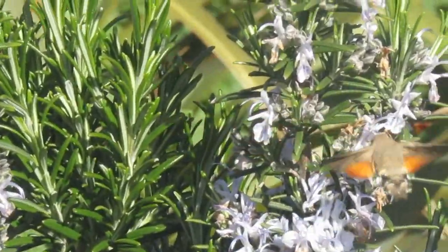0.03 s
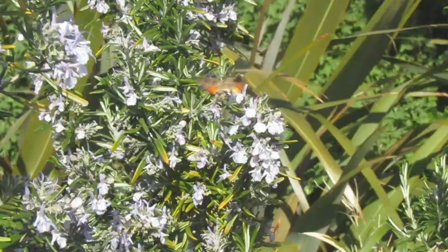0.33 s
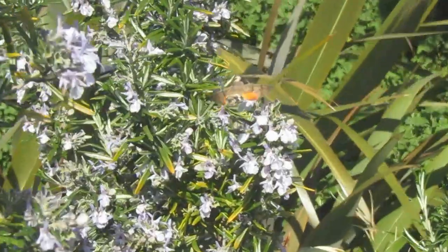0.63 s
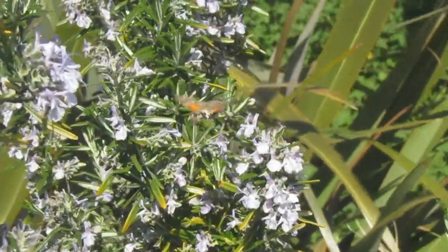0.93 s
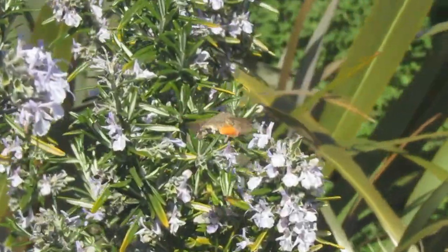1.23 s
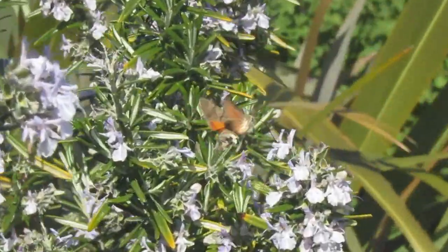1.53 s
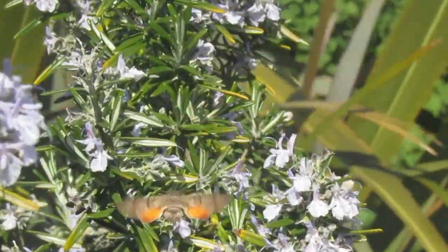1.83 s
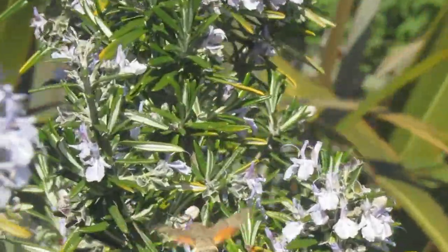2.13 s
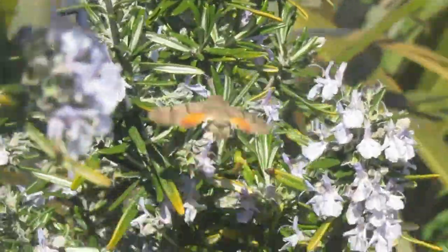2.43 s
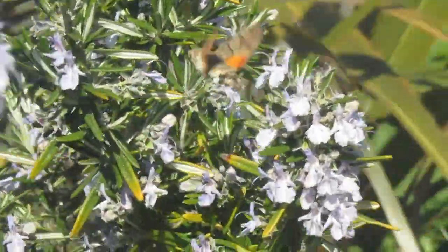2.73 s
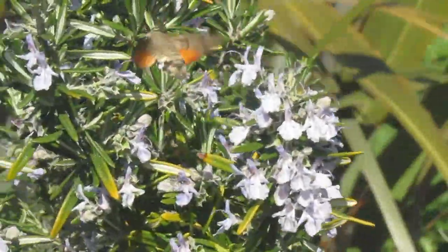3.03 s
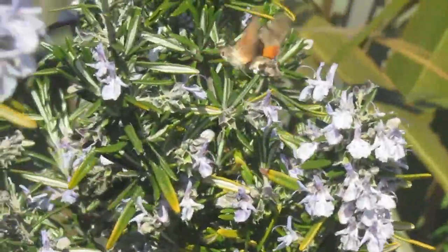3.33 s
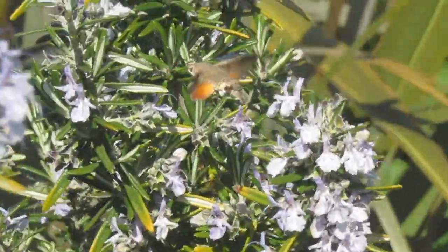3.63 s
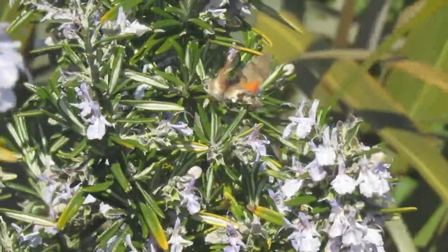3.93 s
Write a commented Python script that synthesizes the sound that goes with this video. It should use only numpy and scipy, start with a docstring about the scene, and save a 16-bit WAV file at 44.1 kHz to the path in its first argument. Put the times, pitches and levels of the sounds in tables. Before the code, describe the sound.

Gusty wind rumbles and thumps on the microphone outdoors, twice hard enough to distort. Before it arrives, a zoom motor whirs softly close by over quiet garden air, far birds and an engine hum, which briefly drop out.

```python
"""A sunny garden, heard through the microphone of a small camera. An engine idles far off under a brief hum.
The garden dips as the zoom motor whirs briefly, close by; everything cuts to silence, then garden and motor
return. Small birds chirp at a distance and a faint wail drifts in. From 1.6 s wind buffets the microphone;
the motor stops and leaves begin to hiss. Two hard blows, near 2.2 s and 3.3 s, overload the input, and each
time the gain control ducks and creeps back."""
import sys
import numpy as np
from scipy import signal
from scipy.fft import rfft, irfft
from scipy.io import wavfile
from scipy.ndimage import uniform_filter1d

SR = 44100
rng = np.random.default_rng(int(sys.argv[2]) if len(sys.argv) > 2 else 0)


def materialize(psi):
    """Save the field psi as 16-bit PCM at rate SR to the path in sys.argv[1].

    A 1-D psi becomes a single channel; in a 2-D psi each row is a channel.
    """
    bounded = np.clip(np.atleast_2d(psi).T, -1, 1)
    quanta = np.round(bounded * 32767).astype(np.int16)
    wavfile.write(sys.argv[1], SR, quanta)


N = 176400
TIME = np.arange(N) / SR
OPENING_END_S = .31  # air and engine have a different tone up to here


def from_db(db):
    """Decibels to gain."""
    return 10 ** (np.asarray(db) / 20)


def unit_rms(x):
    """Scale to an rms of 1."""
    return x / np.sqrt(np.mean(x ** 2) + 1e-20)


def in_time(rows):
    """Join rows of (time, values...) by straight lines; one curve for each value column."""
    times, *columns = np.transpose(rows)
    return [np.interp(TIME, times, column) for column in columns]


def butter(x, hz, kind, order=2):
    """Causal Butterworth filter."""
    sos = signal.butter(order, np.clip(hz, 10, .45 * SR), kind, fs=SR, output="sos")
    return signal.sosfilt(sos, x + 1e-18)


def drift(rate_hz):
    """Smooth random wander with a spread of 1."""
    step, warm_up = 40, 2000
    pole = np.exp(-2 * np.pi * rate_hz * step / SR)
    noise = rng.standard_normal(N // step + warm_up + 2)
    slow = signal.lfilter([1], [1, -2 * pole, pole * pole], noise)[warm_up:]
    return np.interp(np.arange(N) / step, np.arange(len(slow)), unit_rms(slow))


def coloured(spectrum):
    """Steady noise of rms 1, shaped by rows of (frequency [Hz], relative density [dB])."""
    hz, db = np.transpose(spectrum)
    bins_hz = np.maximum(np.arange(N // 2 + 1) * SR / N, 1)
    shape = from_db(np.interp(np.log(bins_hz), np.log(hz), db))
    return unit_rms(irfft(rfft(rng.standard_normal(N)) * shape, N))


def noise_band(hz, spread):
    """Noise of rms 1 that reaches the fraction `spread` to either side of hz."""
    return unit_rms(butter(rng.standard_normal(N), [hz * (1 - spread), hz * (1 + spread)], "band"))


def sine(hz):
    """A sine of rms 1 that follows a pitch curve."""
    return np.sqrt(2) * np.sin(2 * np.pi * (np.cumsum(hz) / SR + rng.random()))


# Garden air, duller in the opening moment than later: (frequency [Hz], relative density [dB])
OPENING_AIR_SPECTRUM = [(25, -14), (70, -0.5), (180, 5), (400, -3.5), (800, 4), (1200, -6), (1700, -13.5),
                        (2400, -27.5), (4000, -38.5), (6000, -44), (10000, -35), (15000, -46)]
AIR_SPECTRUM = [(25, -4.5), (70, 13.5), (180, 7), (300, 0.5), (600, 0), (1100, -2.5), (1500, -7),
                (2100, -15.5), (3200, -23), (5500, -28.5), (7400, -29), (7900, -29.5), (10000, -28),
                (12500, -31.5), (15000, -45)]
# Its level at the microphone, in the opening and later: (time [s], level [dB])
OPENING_AIR_LEVEL = [(0, -35), (.06, -38), (.14, -41), (.31, -41)]
AIR_LEVEL = [(.6, -39.5), (1.6, -39.5), (2.3, -38), (2.8, -43.5), (3.2, -40.5), (4.0, -40.5)]


def open_air():
    """The low wash of air all round the microphone, with a wavering hum in the opening moment."""
    hum = from_db(-41.5) * sine(hz=661 * (1 + .0076 * drift(50))) * (1 + .3 * drift(36))
    opening = from_db(in_time(OPENING_AIR_LEVEL)[0]) * coloured(OPENING_AIR_SPECTRUM) + hum
    later = from_db(in_time(AIR_LEVEL)[0]) * coloured(AIR_SPECTRUM)
    return np.where(TIME < OPENING_END_S, opening, later)


def electronics_whine():
    """The camera's own electronics add a thin, very faint whine."""
    return from_db(-74) * sine(hz=11795 * (1 + .0004 * drift(30)))


# Hiss of the leaves around the garden: (frequency [Hz], relative density [dB])
LEAF_SPECTRUM = [(500, -30), (1500, 3.5), (3500, -1.5), (6000, -8.5), (10000, -8.5), (15000, -23.5)]
# Swell of the leaves and of a narrow rush near 1 kHz: (time [s], level [dB])
LEAF_LEVEL = [(2.3, -71), (2.75, -58), (3.0, -55.5), (3.22, -55.5), (3.35, -55), (4.0, -61)]
RUSH_LEVEL = [(2.55, -81), (2.8, -55), (3.1, -50), (3.5, -64)]


def leaves_and_rush():
    """Leaves hiss as the wind rises, and a soft midrange rush comes and goes."""
    rush = from_db(in_time(RUSH_LEVEL)[0]) * noise_band(hz=1030, spread=.055)
    return from_db(in_time(LEAF_LEVEL)[0]) * coloured(LEAF_SPECTRUM) + rush


# Engine orders from far off: (multiple of the firing cycle, opening level [dB], later level [dB])
ENGINE_ORDERS = [(2, -32, -37.5), (3, -52.5, -44.5), (4, -45.5, -47), (5, -42.5, -40), (6, -49, -42.5),
                 (7, -73, -50), (8, -56, -48.5), (9, -59.5, -61.5), (10, -71, -56.5)]
IDLE_HZ, IDLE_WANDER = 26.75, .0035


def far_engine():
    """The low orders of a distant idling engine beat into a throb."""
    cycle_hz = IDLE_HZ * (1 + IDLE_WANDER * drift(2.3))
    out = np.zeros(N)
    for order, opening_db, later_db in ENGINE_ORDERS:
        level = from_db(np.where(TIME < OPENING_END_S, opening_db, later_db))
        out += level * sine(order * cycle_hz) * (1 + .13 * drift(3.1))
    return out


# A wail a long way off: (time [s], pitch [Hz], level before scattering [dB])
WAIL = [(.72, 1376, -60), (.78, 1349, -45), (.87, 1250, -46), (1.02, 1212, -52), (1.18, 1208, -68),
        (1.33, 1211, -46), (1.5, 1216, -51), (1.63, 1279, -49), (1.78, 1330, -58), (1.95, 1357, -57),
        (2.15, 1250, -76), (2.41, 1113, -45), (2.5, 1090, -64), (2.6, 1040, -90)]
WAIL_FLUTTER_DB = 3


def far_wail():
    """A faint gliding tone flutters in the moving air on its way to the microphone."""
    hz, db = in_time(WAIL)
    return from_db(db + WAIL_FLUTTER_DB * drift(19)) * sine(hz * (1 + .0036 * drift(60)))


# Birds across the garden:
# (time [s], length [s], start pitch [Hz], middle pitch [Hz], end pitch [Hz], level before scattering [dB])
BIRD_NOTES = [(0.159, 0.047, 3110, 4250, 3560, -56.5), (0.197, 0.039, 4020, 3350, 2780, -54),
              (.67, 0.077, 4550, 4450, 4200, -78), (1.023, 0.038, 4850, 4700, 4780, -62),
              (1.24, 0.031, 4110, 4600, 5300, -58), (1.292, 0.19, 5310, 5320, 5130, -65.5),
              (1.509, 0.055, 3480, 3950, 4500, -61.5), (1.77, 0.093, 5120, 5050, 4600, -59),
              (2.015, 0.097, 4650, 4620, 4650, -61), (2.26, 0.085, 5150, 5050, 5100, -61.5),
              (2.347, 0.029, 3830, 4000, 3650, -51), (2.348, .08, 3600, 3250, 2810, -53.5),
              (3.399, 0.041, 3450, 3200, 2720, -57), (3.558, 0.017, 3050, 3200, 3300, -51)]
BIRD_JITTER, BIRD_ROUGH_DB = .023, 2.5


def birds():
    """Each note is a short, slightly rough whistle that bends through three pitches."""
    jitter = 1 + BIRD_JITTER * drift(400)
    roughness = from_db(BIRD_ROUGH_DB * drift(100))
    out = np.zeros(N)
    for start, length, start_hz, middle_hz, end_hz, db in BIRD_NOTES:
        at = (TIME >= start) & (TIME < start + length)
        progress = (TIME[at] - start) / length
        bend = np.polyfit([0, .5, 1], [start_hz, middle_hz, end_hz], 2)
        envelope = from_db(db) * np.sqrt(np.abs(np.sin(np.pi * progress)))
        out[at] += envelope * roughness[at] * sine(np.polyval(bend, progress) * jitter[at])
    return out


def garden_scatter(calls, direct_db=-4, echo_db=-3, decay_s=.023):
    """Far calls reach the microphone directly and as a short smear scattered by the garden."""
    tail = rng.standard_normal(SR // 2) * np.exp(-TIME[:SR // 2] / decay_s)
    echo = signal.fftconvolve(calls, tail / np.linalg.norm(tail))[:N]
    return from_db(direct_db) * calls + from_db(echo_db) * echo


# Whir of the zoom motor, right by the microphone: (frequency [Hz], relative density [dB])
ZOOM_SPECTRUM = [(800, 5.5), (1500, -10.5), (2400, 0), (3100, -14), (4400, -7), (5500, -16), (6000, -9),
                 (6500, -19.5), (7300, -5), (7900, -10.5), (8600, -7.5), (9500, -3), (10100, -6.5),
                 (10600, -2.5), (11500, -14), (13000, -19), (15000, -24)]
# Its runs: (start [s], stop [s])
ZOOM_RUNS = [(.074, .136), (.136, .2), (.531, .554), (.554, 2.168)]
# Strength of each run: (running level [dB], extra at the start [dB])
ZOOM_LEVELS = [(-64.5, 8.5), (-54.5, 12), (-56.5, 0), (-52, 19.5)]
# Rattle of the lens gear: (multiple of the turning rate, rms swing [dB])
GEAR_RATTLE = [(2, 0), (3, 0.9), (4, 1.3), (5, -0.4), (6, 1), (9, 0.4), (12, -0.3), (13, -2), (18, 0.9),
               (21, 1.5), (24, 2.5)]
GEAR_HZ, ZOOM_SETTLE_S, ZOOM_ROUGH_DB = 22.54, .057, 1.2


def zoom_motor():
    """The motor starts with a rasp and settles to a whir, finely rattled by the turning gear."""
    level = np.zeros(N)
    for (start, stop), (running_db, kick_db) in zip(ZOOM_RUNS, ZOOM_LEVELS):
        at = (TIME >= start) & (TIME < stop)
        level[at] += from_db(running_db + kick_db * np.exp(-(TIME[at] - start) / ZOOM_SETTLE_S))
    rattle_db = sum(db * sine(np.full(N, multiple * GEAR_HZ)) for multiple, db in GEAR_RATTLE)
    whir = coloured(ZOOM_SPECTRUM)
    return level * whir * unit_rms(from_db(rattle_db + ZOOM_ROUGH_DB * drift(120)))


# Ticks of the lens gear, inside the camera: (time [s])
TICK_TIMES = [.2438, .559, .56, 2.116, 2.1226]
# Ring of each tick: (level [dB], pitch [Hz], decay [s])
TICK_RINGS = [(-39, 10000, 0.0019), (-42.5, 2420, .01), (-40, 3400, 0.0059), (-44, 9800, 0.0073),
              (-43, 2240, 0.0096)]


def gear_ticks():
    """The gear ticks around the motor's starts and stops, each tick a fast-dying band of noise."""
    out = np.zeros(N)
    for start, (db, hz, decay_s) in zip(TICK_TIMES, TICK_RINGS):
        envelope = (TIME >= start) * np.exp(-np.abs(TIME - start) / decay_s)
        out += from_db(db) * envelope * noise_band(hz, spread=.087)
    return out


def turbulence(corner_hz, size, low_cut_hz=75.5, crest=4.2):
    """Lumps of pressure on the microphone, falling ever more steeply above the corner; rms 1."""
    rumble = butter(rng.standard_normal(size), corner_hz, "low")
    rumble = unit_rms(butter(rumble, low_cut_hz, "high"))
    rounded = np.tanh(rumble / crest)
    return unit_rms(butter(rounded, 1.92 * corner_hz, "low", order=4))


# Flow over the microphone between gusts: (time [s], level [dB])
BREEZE_LEVEL = [(1.55, -73), (1.85, -30.5), (2.25, -27), (2.45, -37.5), (2.9, -35.5), (3.15, -44.5),
                (3.35, -26), (3.6, -20), (4.0, -25.5)]
# Gusts straight on the microphone: (peak time [s], level [dB], half length [s], corner frequency [Hz])
GUSTS = [(1.631, -34.5, 0.017, 206), (1.712, -21.5, 0.022, 246), (1.763, -27, 0.025, 240),
         (1.851, -30, .012, 328), (1.91, -25.5, .02, 417), (1.947, -19, 0.026, 317),
         (2.001, -18.5, 0.015, 370), (2.045, -19.5, 0.011, 234), (2.132, -13, 0.0068, 293),
         (2.167, -19, 0.017, 330), (2.189, -9.5, 0.0048, 710), (2.219, -3, 0.014, 490),
         (2.278, -16.5, 0.025, 278), (2.323, -11.5, 0.014, 230), (2.359, -16.5, 0.0062, 260),
         (2.445, -18, 0.016, 283), (2.485, -23.5, 0.017, 210), (2.551, -28.5, 0.012, 220),
         (2.594, -18.5, 0.0082, 223), (2.678, -31, 0.011, 247), (2.749, -19.5, 0.029, 400),
         (2.793, -19, 0.018, 493), (2.848, -26.5, 0.024, 240), (2.938, -22.5, 0.014, 333),
         (2.994, -10, 0.0095, 422), (3.034, -18, 0.011, 260), (3.239, -16.5, 0.014, 237),
         (3.261, -7, 0.0061, 460), (3.281, -12, .011, 814), (3.3, -8.5, 0.019, 610),
         (3.335, -9, 0.0086, 480), (3.378, -13.5, 0.011, 520), (3.425, -24, 0.021, 367),
         (3.515, -30, 0.034, 273), (3.598, -14, 0.029, 519.7), (3.666, -17, 0.018, 365),
         (3.736, -26, 0.029, 327), (3.784, -22.5, 0.012, 427), (3.817, -23, 0.004, 406),
         (3.861, -18.5, 0.017, 352), (3.912, -19.5, 0.014, 298), (3.952, -19, 0.014, 620),
         (3.995, -15, 0.012, 336)]
LUMPS_DB, LUMPS_HZ = 3, 76


def wind():
    """Short bell-shaped gusts of turbulence buffet the microphone, riding on a weaker flow."""
    lumps = from_db(LUMPS_DB * drift(LUMPS_HZ))
    out = from_db(in_time(BREEZE_LEVEL)[0]) * unit_rms(turbulence(corner_hz=233, size=N) * lumps)
    reach = SR // 6
    for peak_s, db, half_s, corner_hz in GUSTS:
        flow = turbulence(corner_hz, size=2 * reach)
        at = int(peak_s * SR) + np.arange(-reach, reach)
        flow, at = flow[at < N], at[at < N]
        bell = 1 / np.cosh((TIME[at] - peak_s) / half_s) ** 2
        puff = flow * lumps[at] * bell
        puff *= np.sqrt(np.sum(bell ** 2) / np.sum(puff ** 2))  # same energy as the smooth bell
        out[at] += from_db(db) * puff
    return out


# Single eddies that hit the microphone: (time [s], peak before the low cut [dB], width [ms])
EDDIES = [(1.851, -5.5, 0.52), (1.941, -12, 0.6), (1.991, -10, 0.95), (2.018, -8, 0.32), (2.133, -4, .8),
          (2.1843, 12, 0.49), (2.221, -2, 0.55), (2.278, -6, 0.27), (2.445, 0, 0.91), (2.741, -2, 0.4),
          (2.79, -6, 0.94), (2.987, -0.5, 0.46), (3.2845, 11, 0.41), (3.332, -8, 0.51), (3.422, -7, 0.38),
          (3.565, 0.5, 0.32), (3.787, -9, 0.43), (3.826, -8, .35), (3.85, -6, 0.6), (3.864, -1, 0.55),
          (3.943, -6.5, 0.46)]


def eddy_slaps(low_cut_hz=110):
    """Each eddy is one rounded pressure pulse; the low cut gives it a rebound."""
    pulses = np.zeros(N)
    for peak_s, db, width_ms in EDDIES:
        widths_away = (TIME - peak_s) * 1e3 / width_ms
        pulses += from_db(db) * np.exp(-.5 * np.minimum(widths_away ** 2, 80))
    return butter(pulses, low_cut_hz, "high", order=1)


# Gaps in the sound of the garden: (start [s], end [s])
DROPOUTS = [(.066, .1355), (.31, .531)]


def dropout_gain(dip_db=-20):
    """The level dips briefly, then cuts to silence for a moment."""
    gain = np.ones(N)
    for (start, end), floor in zip(DROPOUTS, (from_db(dip_db), 0)):
        gain[(TIME >= start) & (TIME < end)] = floor
    return uniform_filter1d(gain, size=30)


def scene():
    """One microphone: the garden behind with its dropouts, the lens close by, the wind right on it."""
    background = open_air() + electronics_whine() + leaves_and_rush() + far_engine()
    background += garden_scatter(far_wail() + birds())
    wind_start_s = BREEZE_LEVEL[0][0]
    buffeting = (wind() + eddy_slaps()) * (TIME > wind_start_s)
    return (background * dropout_gain() + zoom_motor() + gear_ticks() + buffeting)[None]


ATTACK_S, RECOVER_DB_PER_S, CUTOFF_HZ = .00037, 18.5, 15000


def record(dry):
    """The camera's input: overloads duck the gain, which recovers slowly; peaks clip, the top is cut."""
    overload_db = np.maximum(20 * np.log10(np.abs(dry[0]) + 1e-9), 0)
    recovery_db = RECOVER_DB_PER_S * TIME
    duck_db = np.maximum.accumulate(overload_db + recovery_db) - recovery_db
    pole = np.exp(-1 / (ATTACK_S * SR))
    duck_db = signal.lfilter([1 - pole], [1, -pole], duck_db)
    clipped = np.clip(dry * from_db(-duck_db), -1, 1)
    return signal.sosfilt(signal.ellip(10, .1, 80, CUTOFF_HZ, fs=SR, output="sos"), clipped)


dry = scene()
out = record(dry)
materialize(out)
```